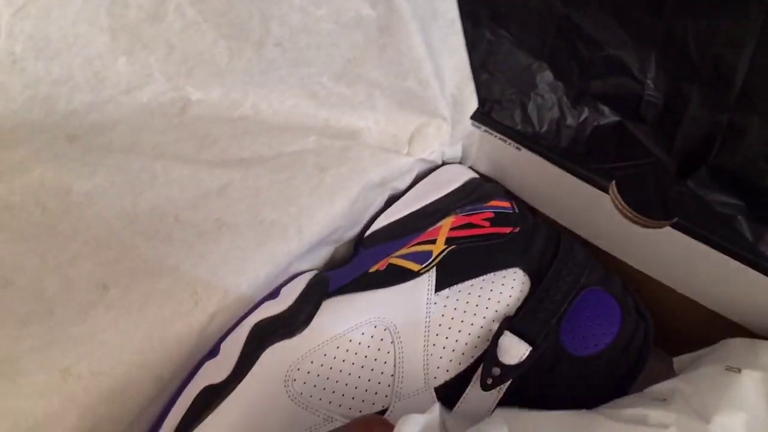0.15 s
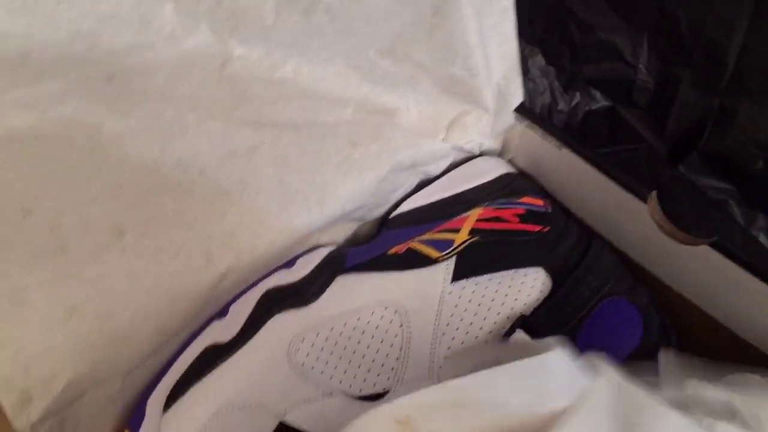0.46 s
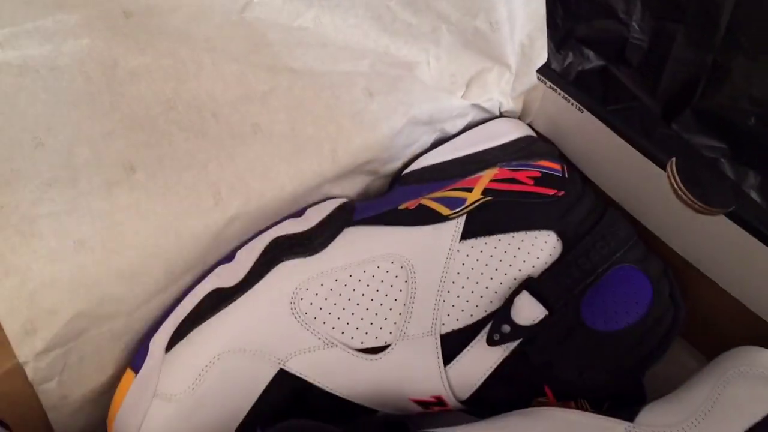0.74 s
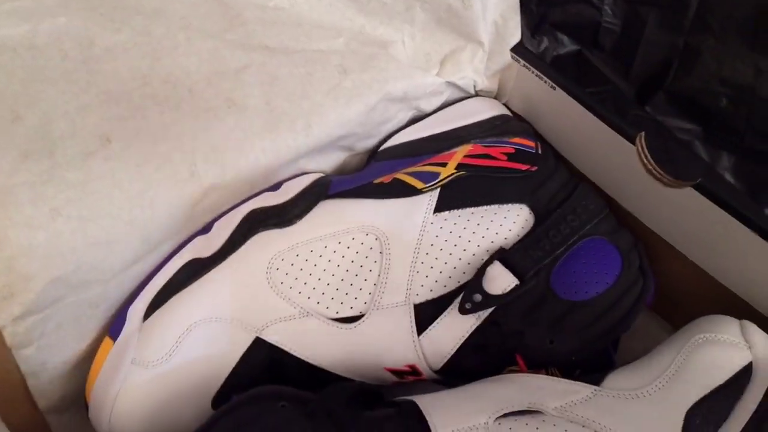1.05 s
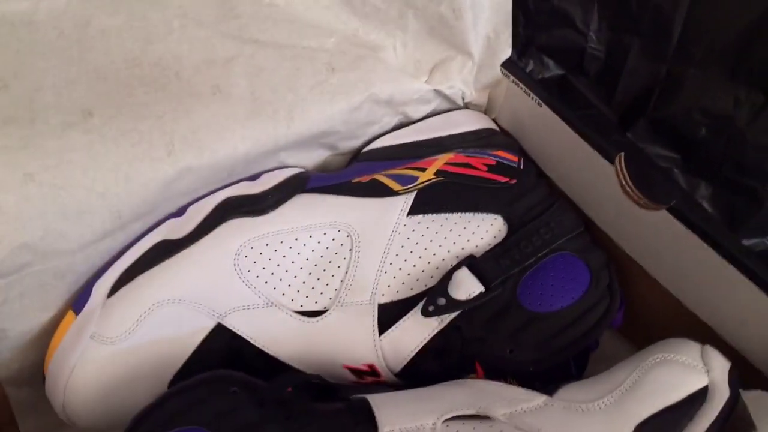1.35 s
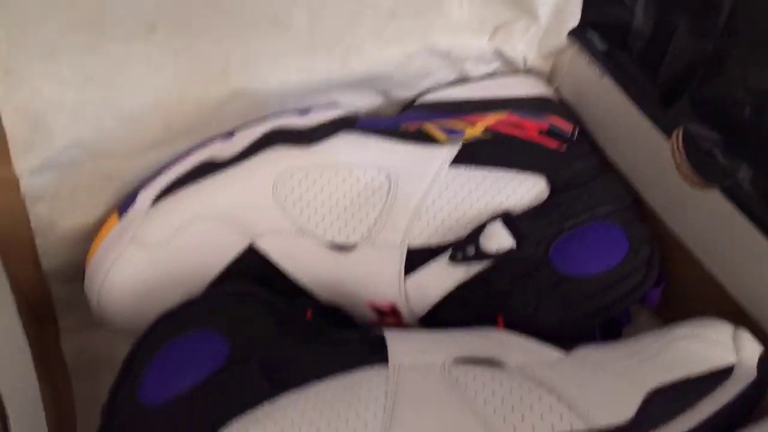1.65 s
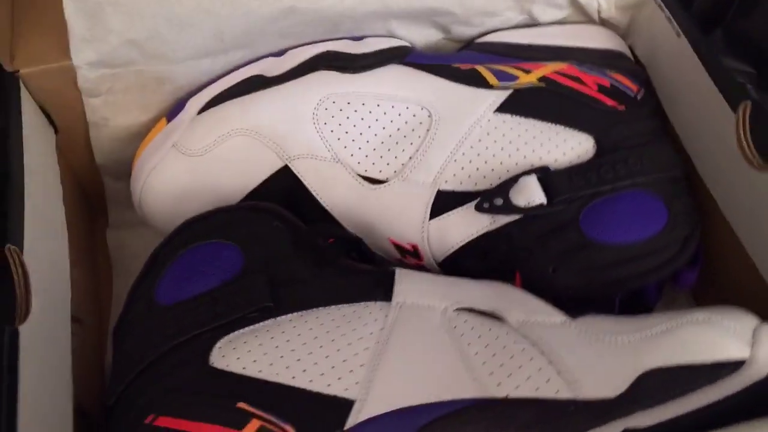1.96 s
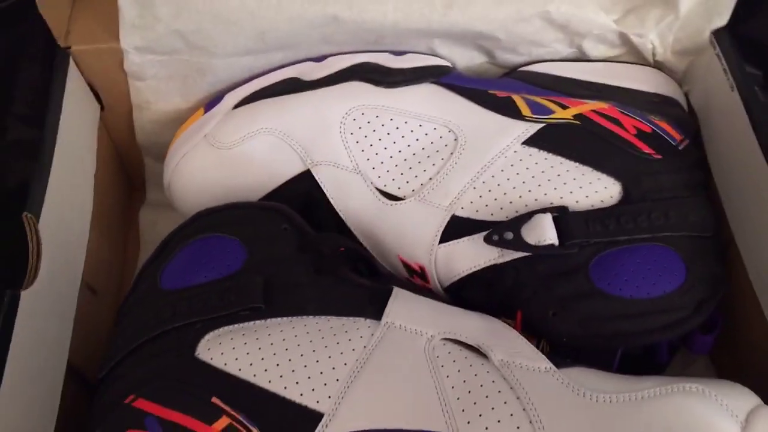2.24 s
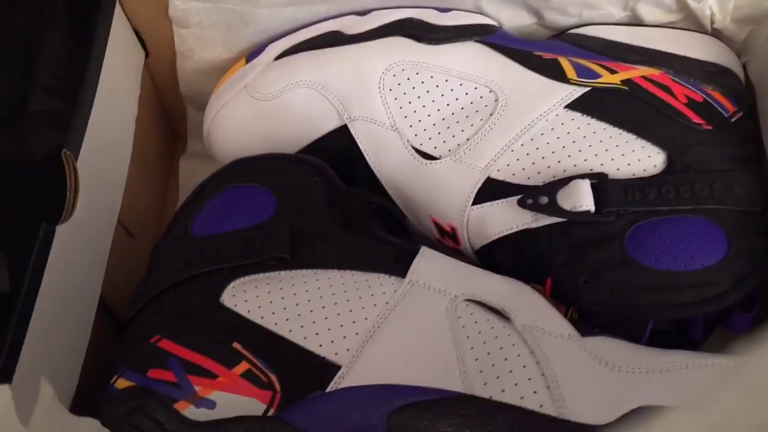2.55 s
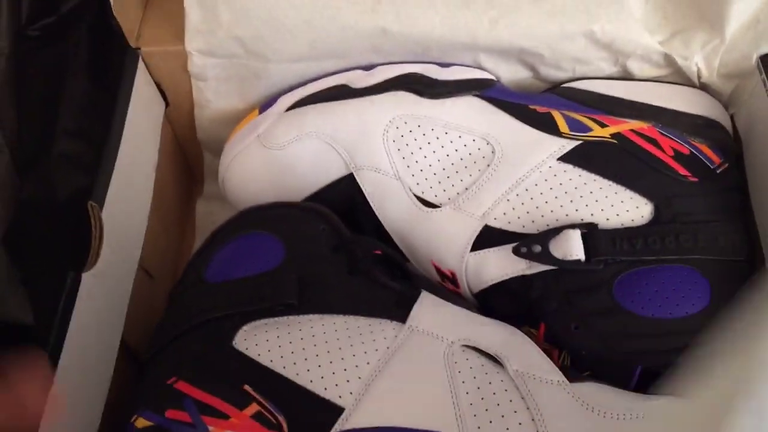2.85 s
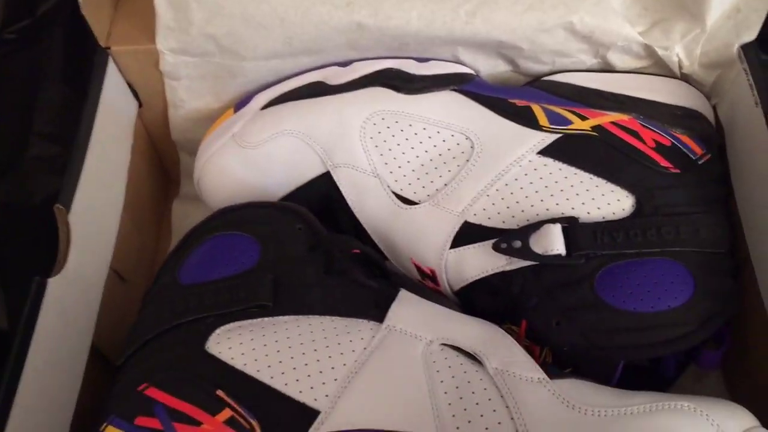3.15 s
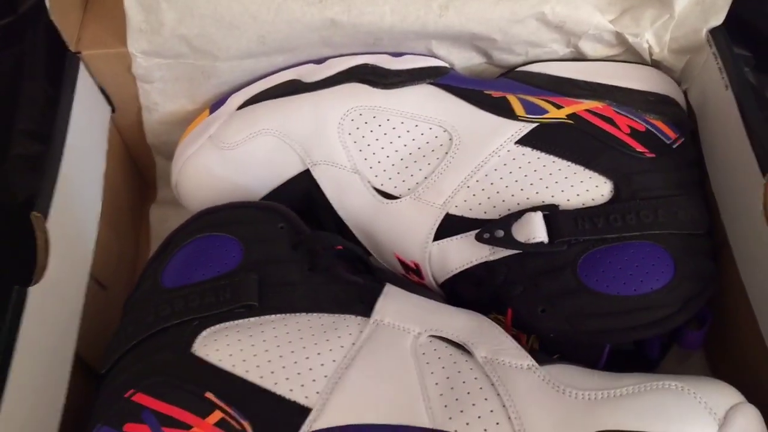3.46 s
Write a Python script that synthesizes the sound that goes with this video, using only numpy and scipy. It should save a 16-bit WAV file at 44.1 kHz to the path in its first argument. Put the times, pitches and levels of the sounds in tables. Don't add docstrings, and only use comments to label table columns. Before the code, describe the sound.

Thin wrapping paper rustles and snaps close by, fading to sparse crinkles before a final burst.

```python
import sys
import numpy as np
from scipy import signal
from scipy.fft import rfft, irfft
from scipy.io import wavfile
from scipy.ndimage import uniform_filter1d, map_coordinates

SR = 44100
rng = np.random.default_rng(int(sys.argv[2]) if len(sys.argv) > 2 else 0)


def store_pcm(level_fs):
    pcm = np.round(np.clip(level_fs, -1, 1) * 32767).astype(np.int16)
    wavfile.write(sys.argv[1], SR, np.atleast_2d(pcm).T)


def makeup_ratio(level_db):
    decades = np.asarray(level_db, float) / 20
    return 10 ** decades


N = 158760

# frequency_hz, density_db (per Hz)
RUMBLE_SPECTRUM = [(15, -44.5), (25, -16.5), (102, 6), (151, -1.5), (200, -33.5), (300, -32.5), (390, -61),
                   (660, -120)]
# frequency_hz, density_db (per Hz)
HISS_SPECTRUM = [(200, 5), (1000, -2.5), (7000, -10), (15000, -20)]
# frequency_hz, t60_s
BOX_DECAY = [(300, 0.31), (2000, 0.074), (12000, 0.019)]
# frequency_hz, density_db (per Hz)
BRUSH_SPECTRUM = [(120, -45.5), (200, -7), (300, 1.5), (600, -15)]
# frequency_hz, density_db (per Hz)
PAPER_SPECTRUM = [(120, -38), (200, -5), (371, -8), (469, -8.5), (1210, -3), (3100, 1), (12300, -8.5),
                  (15300, -10.5)]
# frequency_hz, gain_db
MICROPHONE = [(20, -16), (45, 0), (10100, 0), (10500, -5), (10900, 0), (15300, 0), (15700, -40),
              (16500, -48)]

# start_s, length_s, level_db, centre_hz
RUBS = [
    (1.466, 0.039, -44, 1900),
    (1.532, 0.01, -54.5, 1200),
    (1.719, 0.0065, -55, 760),
    (2.017, 0.076, -68, 880),
    (2.26, 0.024, -54.5, 1300),
]
# start_s, length_s, level_db
OPENING_MOTION = [(0, 0.23, -40), (0.117, 0.023, -35.5), (0.142, 0.054, -26), (0.217, 0.046, -25.5),
                  (0.275, 0.084, -37.5), (0.318, 0.071, -33.5), (0.4, 0.15, -33), (0.501, 0.035, -17),
                  (0.549, 0.031, -24), (0.563, 0.031, -15.5), (0.599, 0.07, -33.5), (0.682, 0.23, -36.5),
                  (0.818, 0.025, -25), (0.872, 0.013, -30.5), (0.946, 0.56, -45), (1.261, 0.046, -29.5),
                  (1.341, 0.074, -28.5), (1.373, 0.025, -29), (1.406, 0.07, -40.5), (1.459, 0.039, -44),
                  (1.645, 0.0097, -54.5), (1.717, 0.0099, -56), (1.767, 0.035, -34.5), (1.81, 0.065, -34.5),
                  (1.867, 0.045, -68)]
CLOSING_MOTION = [(1.93, 0.32, -66), (2.19, 0.097, -53), (2.263, 0.039, -42), (2.304, 0.17, -44.5),
                  (2.383, 0.087, -40), (2.496, 0.005, -41), (2.528, 0.073, -55), (2.621, 0.0057, -38),
                  (2.773, 0.014, -50), (2.836, 0.2, -44.5), (2.888, 0.015, -33), (2.939, 0.056, -30.5),
                  (3.035, 0.1, -31.5), (3.13, .027, -42), (3.14, 0.1, -52), (3.217, 0.017, -41.5),
                  (3.266, 0.034, -34), (3.311, 0.037, -42.5), (3.353, 0.077, -26.5), (3.416, 0.056, -21.5),
                  (3.481, 0.032, -34), (3.52, 0.013, -41.5), (3.566, .04, -34.5)]
# start_s, length_s, level_db, low_against_high_band_db
EARLY_RUNS = [(0.026, 0.006, -42, 7), (0.0435, 0.0055, -49.5, 8), (0.1262, 0.02, -23, 0.5),
              (0.1623, 0.0047, -26, -5), (0.1914, 0.0035, -21.5, -2), (0.2034, 0.004, -21.5, 0),
              (0.2236, 0.0058, -19.0, -4.5), (0.2466, 0.0025, -22.5, -3), (0.2556, 0.0031, -17.5, -1),
              (0.3328, 0.0056, -24.5, -1.5), (0.3513, 0.0032, -28.5, -6), (0.3611, 0.0044, -26.5, 2),
              (0.3787, 0.01, -28, -6.5), (0.4027, 0.0074, -34.5, -9), (0.5243, 0.0033, -14, -9),
              (0.5995, 0.0045, -17, -12), (0.6112, 0.0055, -23, -11.5), (0.6434, 0.005, -28, -11.5),
              (0.6557, 0.0034, -33, 2), (0.6639, 0.003, -33.5, 0), (0.6924, 0.0066, -37, 4),
              (0.725, 0.0051, -35, -4), (0.7726, 0.0058, -33, 2.5), (0.8013, 0.0023, -22.5, -4.5),
              (0.8526, 0.0029, -27, -5.5), (0.8806, 0.0056, -33.5, 1.5), (0.8942, 0.0024, -27, -6),
              (1.0063, 0.0033, -37.5, 1)]
LATE_RUNS = [(1.2437, 0.0071, -32.0, 0), (1.2781, 0.005, -26.5, -1.0), (1.2937, 0.0032, -24.5, -3.5),
             (1.3171, 0.0033, -29.5, -6), (1.3393, 0.0055, -26, 1), (1.3499, 0.0035, -25, -5),
             (1.3831, 0.0082, -20, -4), (1.3953, 0.0024, -26, -4), (1.427, 0.0046, -27.5, 4.5),
             (1.4499, 0.0048, -31.5, 4), (1.913, 0.0027, -42, 6), (2.4409, 0.0064, -44, -1),
             (2.6306, 0.0067, -34, -5), (2.9045, 0.0045, -32, -8.5), (2.9616, 0.0037, -28.5, -10),
             (2.9779, 0.0101, -30, 2.5), (2.9924, 0.0085, -34, 3.5), (3.0439, 0.0029, -33, 11),
             (3.0816, 0.0015, -26, -4), (3.123, 0.0029, -33, 13), (3.2748, 0.0031, -27.5, 5),
             (3.2848, 0.0048, -38, 8), (3.3915, 0.0048, -28.5, 10), (3.427, 0.0029, -24, 1),
             (3.4518, 0.0027, -17.0, -2), (3.4674, 0.0046, -22, -4.0), (3.4922, 0.0054, -33, 7),
             (3.542, 0.003, -37.0, 5)]
EXTRA_RUNS = [(0.2978, .005, -27.5, 7), (0.4168, .007, -21.5, -1), (0.469, 0.0042, -18, -4),
              (0.713, .006, -26, -5.5), (0.755, 0.014, -26, -3), (3.052, 0.01, -22.5, -7.5)]
# start_s, peak_db, low_db (0.5-2.5 kHz part against the peak), t60_s
LIFT_SNAPS = [(0.1509, 1, -19, 0.013), (0.1738, -14.5, -5.5, 0.056), (0.2172, -9.5, -28.5, 0.013),
              (0.2392, -12, -10.5, 0.0051), (0.2745, -8.5, -14.5, 0.045), (0.3211, -19.5, -12, 0.016),
              (0.3447, -9.5, -9.5, 0.0055), (0.4459, -13.5, -13.5, 0.01), (0.5013, -4, -26, 0.0079),
              (0.6405, -11, -12.5, 0.031), (0.6719, -20, -13.5, 0.017), (0.7894, -17.5, -18.5, 0.013),
              (0.816, -7.5, -18.5, 0.039), (0.826, 0.5, -21.5, 0.018), (0.8715, -15.5, -5, 0.034)]
FOLD_SNAPS = [(0.9239, -20.5, -10, 0.026), (0.9553, -15, -24, 0.017), (0.979, -15.5, -8.5, 0.017),
              (0.9902, -7.5, -14, 0.02), (1.024, -24.5, 6.5, 0.041), (1.0346, -17, -14, 0.0088),
              (1.0466, -23.5, -16, 0.0057), (1.0723, -25.5, 4.5, 0.021), (1.0969, -18, -13, 0.033),
              (1.1355, -17, -10.5, 0.0057), (1.1485, -10.5, -13, 0.021), (1.1677, -16.5, -15.5, 0.014),
              (1.1891, -21, -7, 0.052), (1.2142, -9, -21, 0.032), (1.265, -5.5, -23, 0.0057),
              (1.371, -4.5, -13.5, 0.017), (1.6635, -30, -2, 0.012), (1.7657, -17.5, -21, 0.034),
              (1.7933, -12, -24, 0.0054), (1.8585, -8, -12.5, 0.018), (1.8953, -27, -8.5, 0.034)]
SETTLE_SNAPS = [(2.1806, -19.5, -12.5, 0.015), (2.3365, -23, -8, 0.035), (2.385, -20.5, -12, 0.0052),
                (2.4016, -10.5, -10, 0.024), (2.409, -14, -16, 0.0085), (2.461, -13.5, -9, 0.031),
                (2.5254, -25.5, -17.5, 0.024), (2.5983, -30.5, -12, 0.015), (2.6274, -33, -24, 0.022),
                (2.6875, -40, -3.5, 0.057), (2.7808, -32, -8.5, 0.045), (2.8373, -25.5, 4, 0.017)]
PRESS_SNAPS = [(2.9429, -16.5, -17, 0.017), (3.0959, -13.5, -13, 0.03), (3.218, -29.5, 5, 0.013),
               (3.3173, -9, -14.5, 0.0071), (3.363, -8, -29.5, 0.0095), (3.3883, -17.5, -2, 0.007),
               (3.4126, -9.5, -12, 0.0082), (3.4215, -6, -29, 0.014), (3.437, -6.5, -10.5, 0.011)]
# start_s, peak_db, pitch_hz
POPS = [
    (0.989, -6, 6180),
    (1.707, -37.5, 2400),
    (1.861, -16, 2590),
    (1.98, -30, 1810),
    (2.104, -31, 1540),
    (3.317, -4, 1803),
    (3.571, -18.5, 2400),
]

ATTACK_DB_PER_S = 5012
BUMPS_DB = 3.5


def unit(x):
    return x / np.sqrt(np.mean(x ** 2, -1, keepdims=True) + 1e-20)


def along(points, hz):
    f, value = np.transpose(points)
    return np.interp(np.log(hz + 1), np.log(f + 1), value)


def wobble(rate_hz):
    return map_coordinates(rng.standard_normal(N // 100), [np.arange(N) * rate_hz / SR])


def filtered(noise, gain_db):
    return unit(irfft(rfft(noise) * makeup_ratio(gain_db), noise.shape[-1]))


def coloured(spectrum):
    return filtered(rng.standard_normal(N), along(spectrum, np.fft.rfftfreq(N, 1 / SR)))


def placed(bursts, start_s):
    where = np.round(start_s * SR).astype(int)[:, None] + np.arange(bursts.shape[1])
    return np.bincount(where.ravel(), bursts.ravel(), N + bursts.shape[1] + SR)[:N]


def leaning(tilt_db):
    def colour_db(hz):
        slope_db = np.multiply.outer(tilt_db, np.log2(np.maximum(hz, 900) / 3500))
        bass_loss_db = 4 * np.log2(np.clip(hz / 900, .1, 1))
        return along(PAPER_SPECTRUM, hz) + slope_db + bass_loss_db
    return colour_db


def cracks(start_s, peak_db, colour_db, t60_s, size):
    spike_t60_s, body_db, rise_s = .0022, -8, .00028
    hz, t = np.fft.rfftfreq(size, 1 / SR), np.arange(size) / SR
    noise = rng.standard_normal((len(start_s), size))
    knots = rng.standard_normal((len(start_s), 16))
    position = np.sqrt(hz / hz[-1]) * 15
    bumps = np.array([np.interp(position, np.arange(16), k) for k in knots])
    tone = filtered(noise, colour_db(hz) + BUMPS_DB * bumps)
    spike = makeup_ratio(-60 * t / spike_t60_s)
    ringing = makeup_ratio(body_db - 60 * t / np.clip(t60_s, .002, .1)[:, None])
    rise = 1 - np.exp(-t / rise_s)
    return placed(tone * makeup_ratio(peak_db)[:, None] * (spike + ringing) * rise, start_s)


def room():
    swell_db = 0.5 * np.arange(N) / SR + 1.2 * wobble(4.9)
    return makeup_ratio(-49 + swell_db) * coloured(RUMBLE_SPECTRUM) + makeup_ratio(-70.5) * coloured(HISS_SPECTRUM)


def box(x):
    hz, t, z = signal.stft(rng.standard_normal(SR // 4), SR, nperseg=128)
    decay = makeup_ratio(-60 * t / along(BOX_DECAY, hz)[:, None])
    tail = signal.istft(z * decay, SR, nperseg=128)[1]
    delayed = np.pad(x, (60, 0))
    return signal.fftconvolve(delayed, tail / np.linalg.norm(tail))[:N]


def rubs():
    width_octaves, fade_db_per_s = 0.33, 898.5
    t, hz = np.arange(N) / SR, np.fft.rfftfreq(N, 1 / SR) + 1
    total = np.zeros(N)
    for start_s, length_s, level_db, centre_hz in RUBS:
        outside_s = np.maximum(np.abs(t - start_s - length_s / 2) - length_s / 2, 0)
        resonance_db = -6 * (np.log2(hz / centre_hz) / width_octaves) ** 2
        whisper = filtered(rng.standard_normal(N), resonance_db)
        total += makeup_ratio(level_db - fade_db_per_s * outside_s) * whisper
    return total


def motion(release_db_per_s):
    t, power = np.arange(N) / SR, np.zeros(N)
    for start_s, length_s, level_db in [*OPENING_MOTION, *CLOSING_MOTION]:
        rise_db = np.minimum(ATTACK_DB_PER_S * (t - start_s), 0)
        fall_db = np.maximum(release_db_per_s * (t - start_s - length_s), 0)
        power += makeup_ratio(level_db + rise_db - fall_db) ** 2
    return np.sqrt(power)


def slide():
    z = signal.stft(coloured(PAPER_SPECTRUM), nperseg=256)[2]
    field = uniform_filter1d(rng.standard_normal(z.shape), size=8, axis=0)
    field = uniform_filter1d(field, size=10, axis=1)
    patch_gain = makeup_ratio(4 * field / field.std())
    return unit(signal.istft(z * patch_gain, nperseg=256)[1][:N])


def buckles(count=3000):
    u = rng.random((count, 4))
    level_db = -4 * np.log(u[:, 1] + 1 / 20)
    colour_db = leaning(3.5 * (2 * u[:, 2] - 1))
    return unit(cracks(u[:, 0] * N / SR, level_db, colour_db, t60_s=.008 * (.5 + u[:, 3]), size=512))


def rustle():
    dull_hz = 2950
    clumps = makeup_ratio(2 * wobble(70))
    sheet = clumps * (makeup_ratio(-5) * buckles() + makeup_ratio(-6) * slide())
    dull = irfft(rfft(sheet) / (1 + (np.fft.rfftfreq(N, 1 / SR) / dull_hz) ** 2), N)
    slow, quick = motion(release_db_per_s=502), motion(release_db_per_s=1494.5)
    hand_strength = np.sqrt(np.abs(uniform_filter1d(slow ** 2, size=4000)))
    hand = makeup_ratio(-21) * hand_strength * coloured(BRUSH_SPECTRUM)
    return slow * dull + quick * (sheet - dull) + hand


def runs(size=1024):
    lead_s, release_db_per_s = .002, 3200
    events = np.transpose([*EARLY_RUNS, *LATE_RUNS, *EXTRA_RUNS])
    start_s, length_s, level_db, low_db = events[:, :, None]
    since_start = np.arange(size) / SR - lead_s
    tilt_db = -.4 * (low_db[:, 0] + 2)
    colour_db = leaning(tilt_db)(np.fft.rfftfreq(size, 1 / SR))
    bumps = unit(uniform_filter1d(rng.standard_normal(colour_db.shape), size=24, axis=1))
    noise = rng.standard_normal((len(start_s), size))
    tone = filtered(noise, colour_db + BUMPS_DB * bumps)
    grain = unit(uniform_filter1d(rng.standard_normal(noise.shape), size=30, axis=1))
    rise_db = np.minimum(ATTACK_DB_PER_S * since_start, 0)
    fall_db = np.maximum(release_db_per_s * (since_start - length_s * 0.63), 0)
    bursts = tone * makeup_ratio(level_db + 1 + rise_db - fall_db + 4 * grain)
    return placed(bursts, start_s[:, 0] - lead_s)


def pops():
    start_s, peak_db, pitch_hz = np.transpose(POPS)

    def resonance_db(hz):
        return -6 * (np.log2((hz + 1) / pitch_hz[:, None]) / .48) ** 2

    return cracks(start_s, peak_db, resonance_db, np.full(len(start_s), .014), size=1024)


def snaps():
    events = [*LIFT_SNAPS, *FOLD_SNAPS, *SETTLE_SNAPS, *PRESS_SNAPS]
    start_s, peak_db, low_db, t60_s = np.transpose(events)
    tilt_db = -0.65 * (low_db + 11.5)
    return cracks(start_s, peak_db + 2, leaning(tilt_db), t60_s, size=2560)


def scene():
    paper = rubs() + rustle() + runs() + pops() + snaps()
    return (room() + makeup_ratio(-13) * box(paper) + paper)[None]


def roll_off(x):
    return signal.sosfilt(signal.butter(12, 16490, fs=SR, output="sos"), x)


def record(dry):
    ceiling = .5
    limited = dry / (1 + np.abs(dry / ceiling) ** 4) ** .25
    response = makeup_ratio(along(MICROPHONE, np.fft.rfftfreq(N, 1 / SR)))
    mix = irfft(rfft(limited) * response, N)
    return roll_off(mix)


dry = scene()
out = record(dry)
store_pcm(out)
```